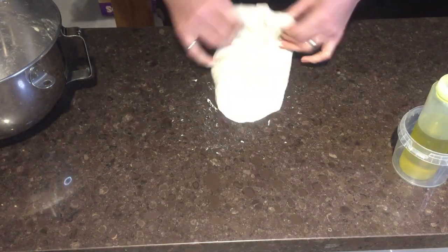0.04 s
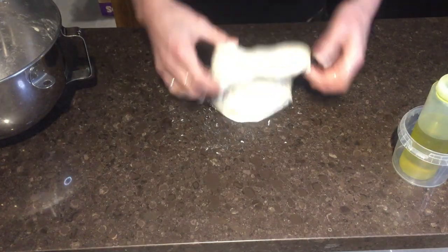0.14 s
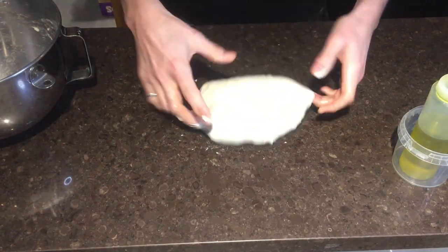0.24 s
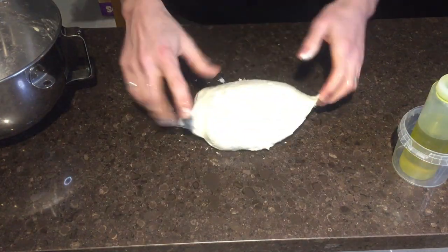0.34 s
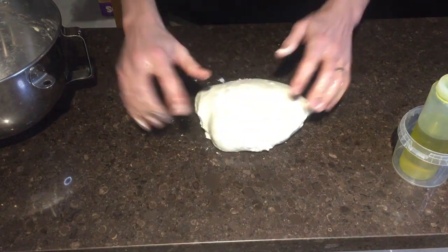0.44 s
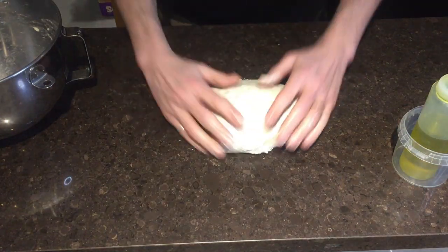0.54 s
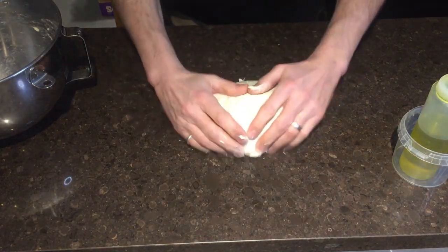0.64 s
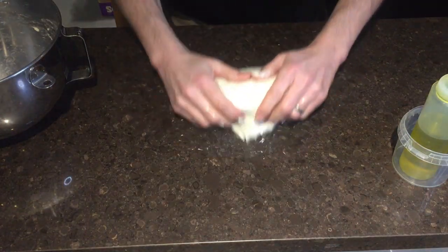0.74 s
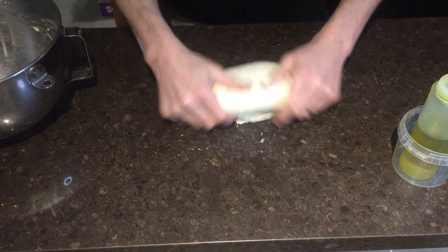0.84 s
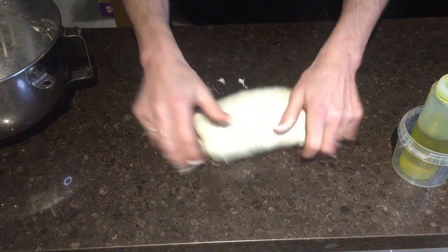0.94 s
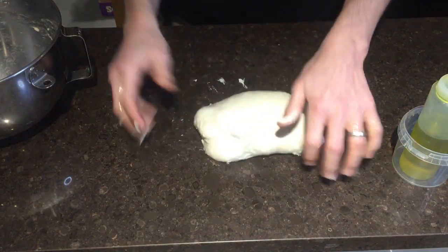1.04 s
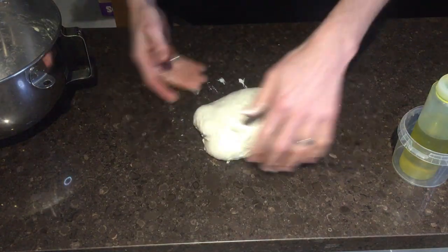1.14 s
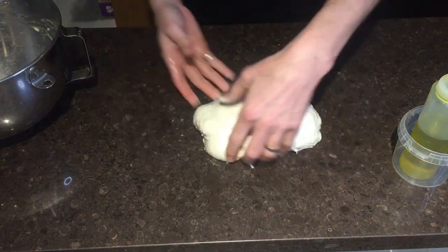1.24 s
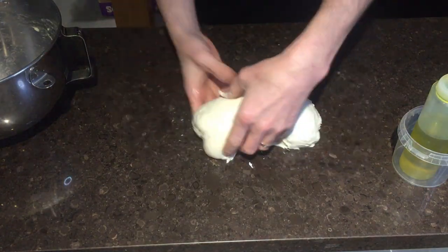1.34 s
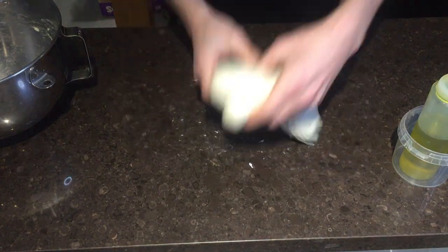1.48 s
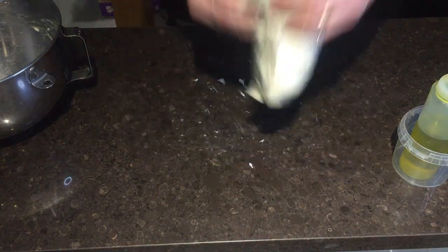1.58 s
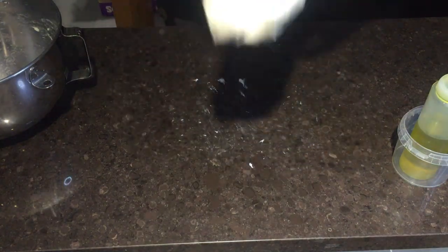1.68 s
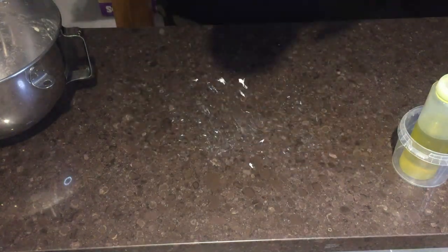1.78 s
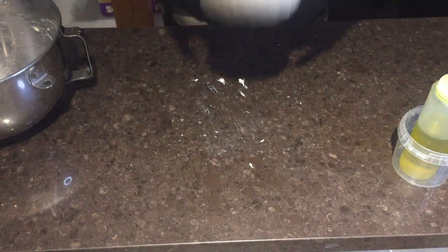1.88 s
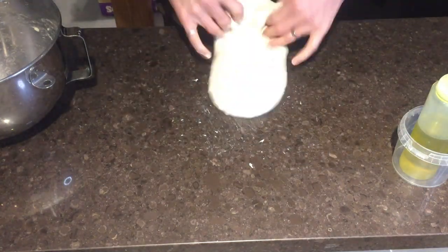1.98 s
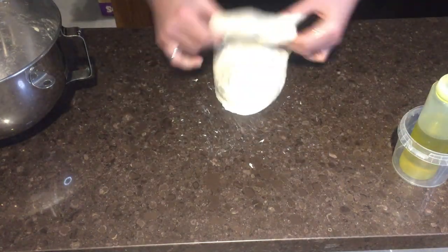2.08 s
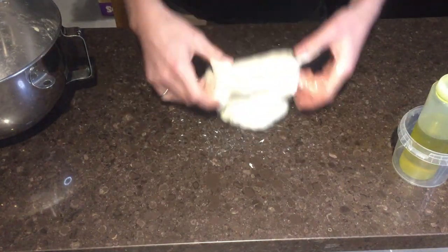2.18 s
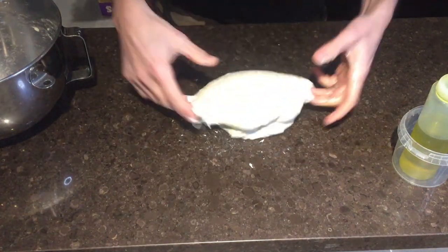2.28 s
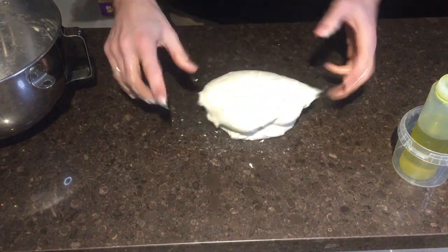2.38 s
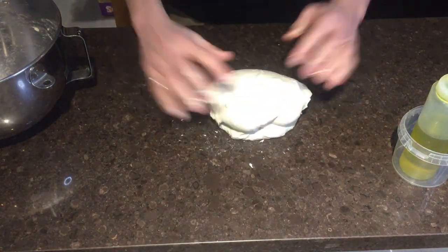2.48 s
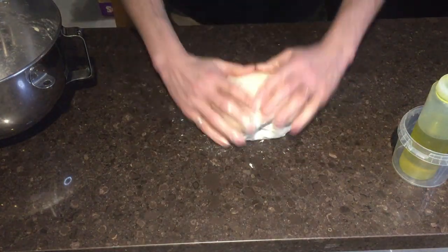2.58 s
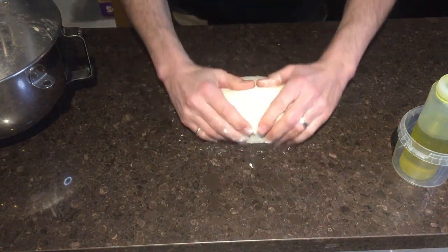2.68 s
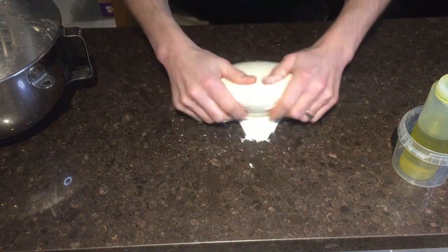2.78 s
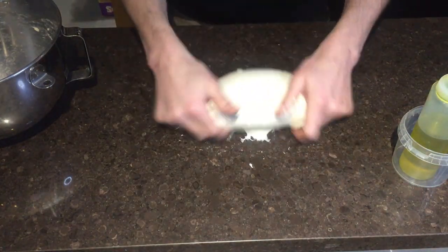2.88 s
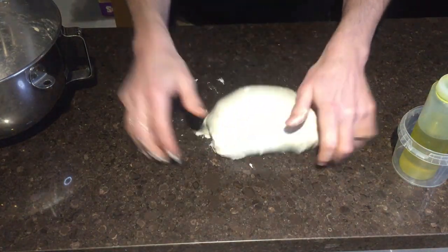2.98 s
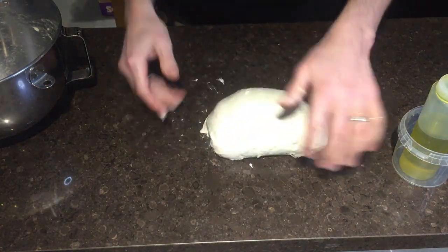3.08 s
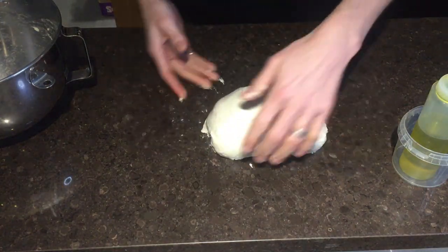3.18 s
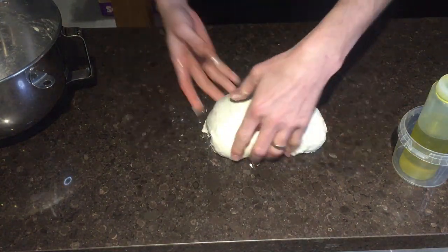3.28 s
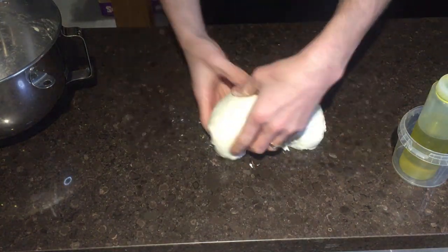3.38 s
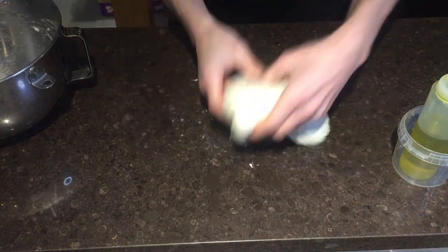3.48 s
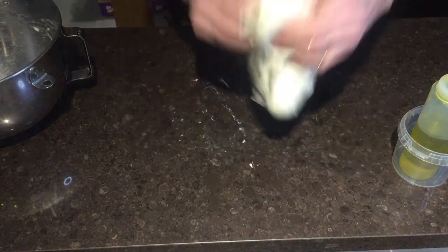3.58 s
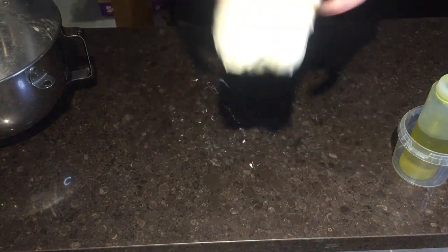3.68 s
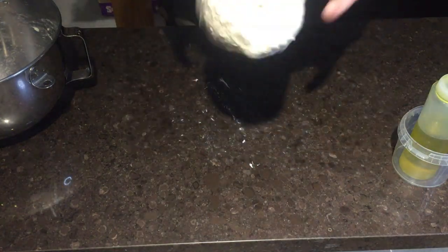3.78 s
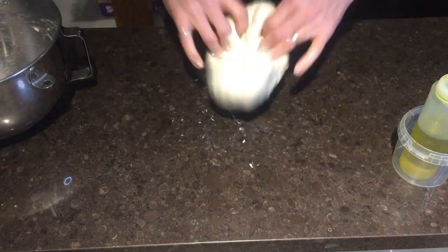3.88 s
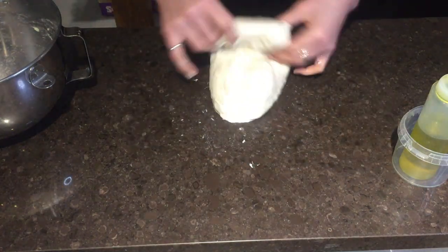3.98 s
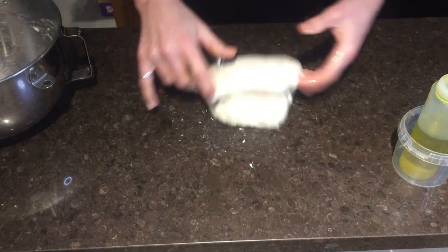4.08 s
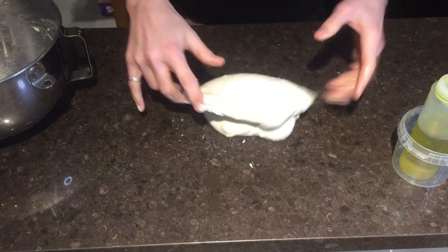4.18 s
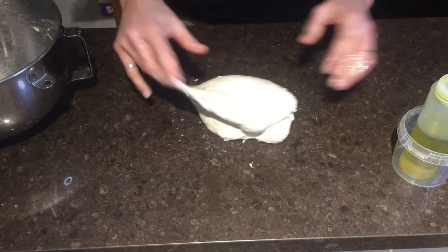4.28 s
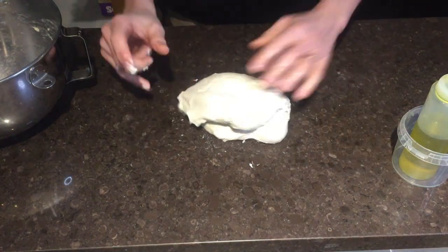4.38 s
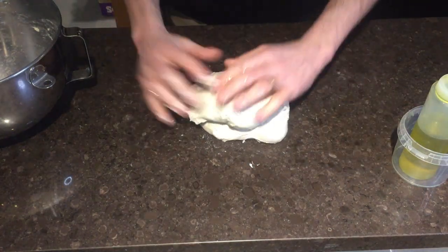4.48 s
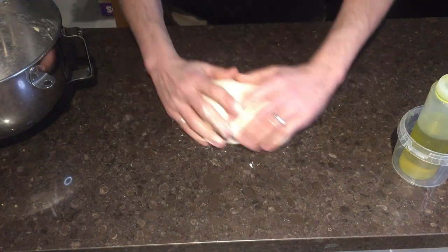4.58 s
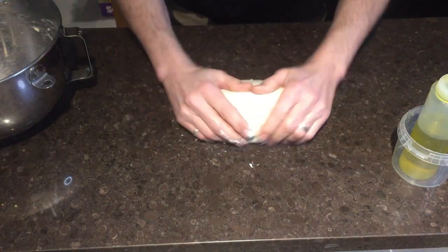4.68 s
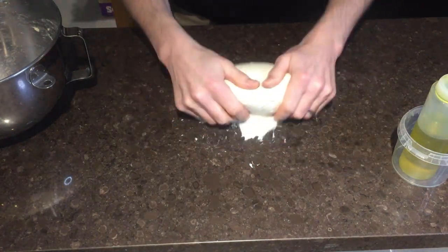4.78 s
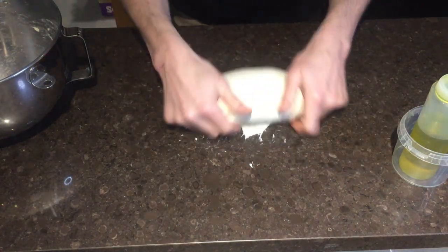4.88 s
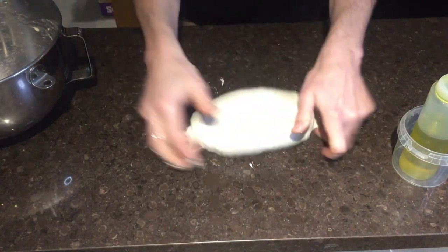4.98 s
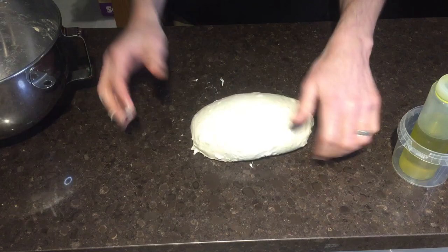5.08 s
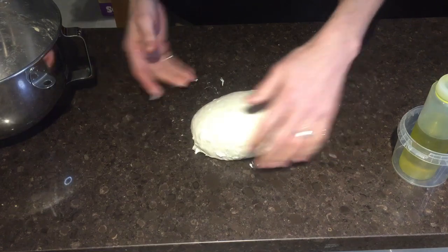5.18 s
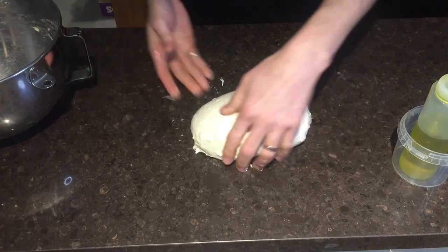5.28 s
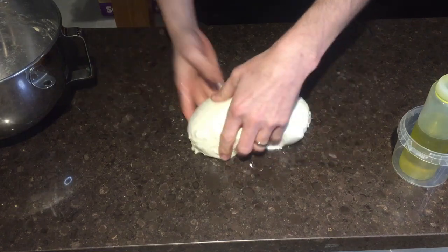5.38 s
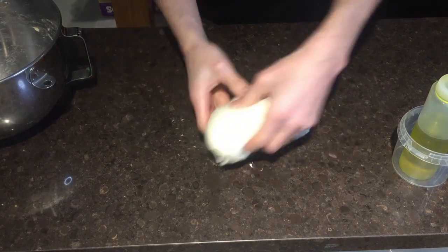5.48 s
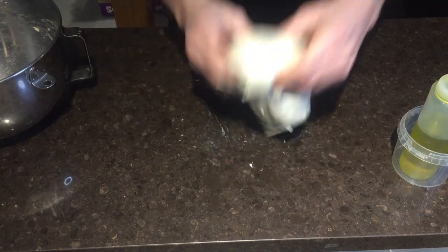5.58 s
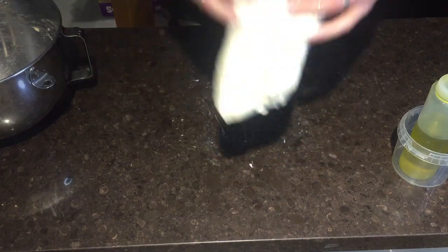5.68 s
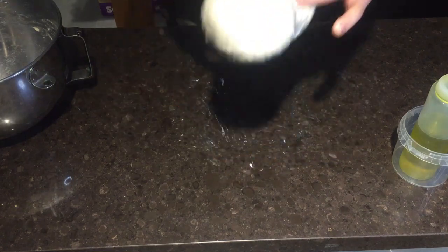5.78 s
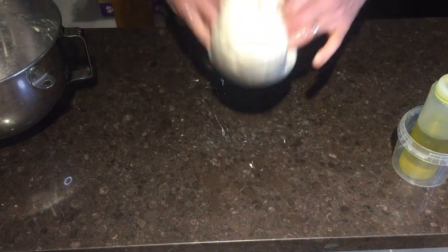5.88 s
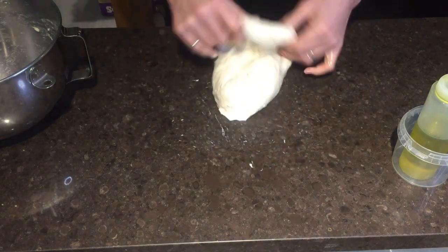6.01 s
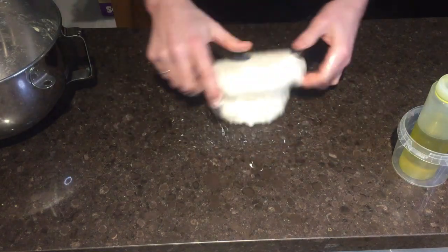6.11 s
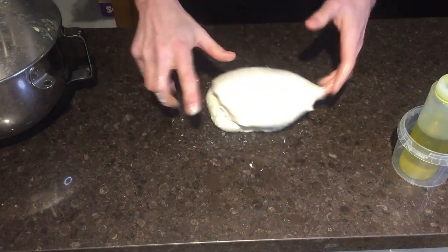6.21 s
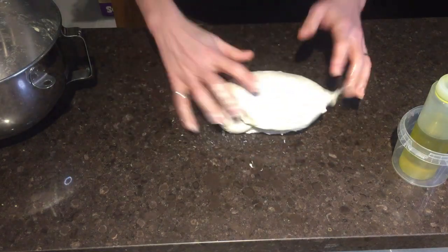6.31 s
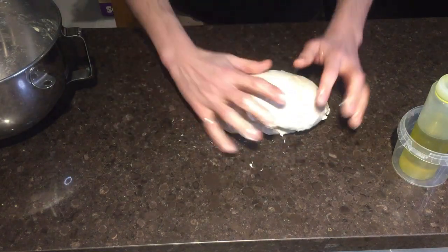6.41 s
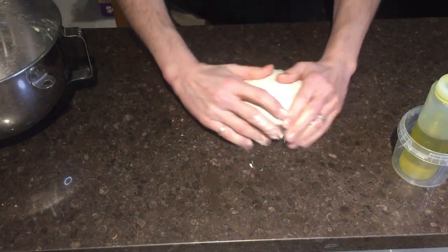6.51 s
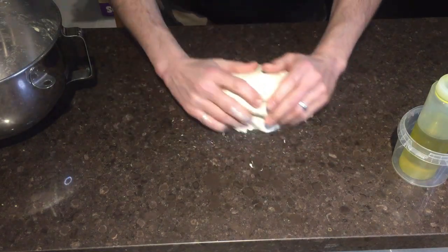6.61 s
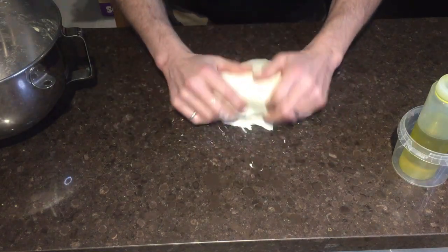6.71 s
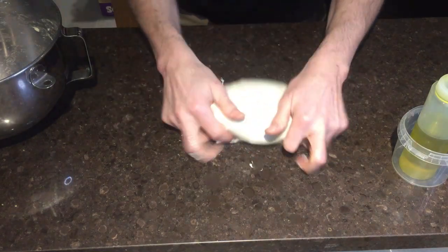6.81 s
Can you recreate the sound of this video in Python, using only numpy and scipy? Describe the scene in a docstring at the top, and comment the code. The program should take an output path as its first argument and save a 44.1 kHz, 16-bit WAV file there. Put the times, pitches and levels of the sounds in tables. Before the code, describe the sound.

Close above a kitchen worktop, a tiny rush leads into a very loud, full dough slap. Quiet handling follows: fingers pat, the mass flops over, skin rubs on stone, sticky dough crackles as it lifts. The cycle repeats with three more slaps, the later ones duller. A steel bowl nearby shimmers briefly after impacts; short room reverberation and a low hum lie underneath.

```python
"""Wet dough is slapped onto a stone countertop four times in a small kitchen; a steel mixing bowl nearby rings along.
A slap is a broadband crack, resonant pops of trapped air, a squelch, and decaying modes of the bodies it shakes.
A rush precedes the first slap; between slaps hands pat, turn, rub and peel: resonant pulses, noise, crackle.
A low appliance drone (noise through narrow resonances) and a faint hiss (coloured noise) lie underneath."""
import sys
import numpy as np
from scipy import signal
from scipy.fft import rfft, irfft
from scipy.io import wavfile

SR = 44100
rng = np.random.default_rng(int(sys.argv[2]) if len(sys.argv) > 2 else 0)


def int16_out(signal):
    """Quantize to a 16-bit WAV file."""
    q = np.round(np.clip(np.atleast_2d(signal).T, -1, 1) * 32767)
    wavfile.write(sys.argv[1], SR, q.astype(np.int16))


N = 302085
T_AFTER = np.arange(SR) / SR  # the second that follows a contact

# Slaps [t/s, air pop level/dB, air pop f/Hz, small pocket level/dB, small pocket f/Hz,
# wet crack level/dB, crack peak f/Hz, crack and squelch top f/Hz, squelch level/dB,
# counter ringing level/dB, thud level/dB, bowl level/dB before a 3 dB cut, bowl tilt/(dB per octave)]
SLAPS = [(0.0700, 31, 651.6, 24, 1213, 5.5, 8780, 18250, -31.5, 0.5, -32, -37.5, -2.5),
         (2.0579, 21, 660, 19, 1344, 8, 3286, 11000, -29.5, -8, -30, -38.5, 5.5),
         (3.9977, 21, 586.4, 17.5, 1258, 2.5, 5820, 10890, -37.5, -5.5, -35, -51, 2),
         (6.0397, 16, 476, 15, 1332, -1, 3500, 6910, -33.5, -13, -34, -48.5, 16)]
# Ringing modes of counter and cabinet [f/Hz, level/dB, t60/s]
COUNTER_MODES = [(200, -45.5, 0.57), (294, -34.5, 0.34), (338.5, -25, 0.23), (377, -30.5, 0.17),
                 (438, -32, 0.18), (546, -25.5, .14), (648, -27, .09), (641, -21.5, 0.19), (650, -26, .17),
                 (914, -25.5, .14), (1040, -26, 0.22), (1180, -28.5, .11), (1252, -26, 0.084),
                 (1336, -29.5, .12), (1350, -29, 0.074), (1486.6, -29, .08), (1737, -28, .12),
                 (2107, -24.5, 0.074)]
# Ringing modes of the steel bowl, before tilt and random spread [f/Hz, level/dB, t60/s]
BOWL_MODES = [(335, -21, 2), (948.3, -14.5, 1.7), (958, -13, .6), (980, -7, 0.67), (1038, -8.5, 0.43),
              (1804, 1.5, 0.53), (1860, -4.5, 0.65), (1927, -7.5, 0.52), (2010, -3.5, 0.47),
              (2024, 2, 0.62), (2170, -1.5, .32), (2180, -3.5, 0.31)]
# The weight of the dough shakes the whole worktop [f/Hz, level/dB, t60/s]
THUD_MODES = [(59, 1.5, 0.25), (74.0, -4.5, 0.41), (96, -4.5, 0.11), (129, -7.5, 0.16)]
# Fingers patting the dough [t/s, level/dB, f/Hz before random spread, counter share level/dB,
# hollow of the palm level/dB, wet tick level/dB, wet tick f/Hz]; the two shares add to the first level
PATS = [(1.05, -8.5, 780, 0, -10, -22, 3130), (1.098, -15, 1108, -12, -11, -27, 2300),
        (3.099, -23.5, 870, 5, 11, -23.5, 5200), (5.106, -2, 1060, -6.5, -2.5, -27, 4000),
        (6.593, -10, 1750, -8, -22, -19.5, 4200)]
# The folded mass flops over as a hand turns it [t/s, level/dB, f/Hz]
FLOPS = [(1.307, -45.5, 202), (3.344, -48, 179.2), (5.367, -51.5, 178)]
# The thickest sticky strands snapping [t/s, level/dB, f/Hz]
SNAPS = [(0.2977, -29, 8700), (0.7992, -25, 6040), (1.5008, -35, 2720), (1.8424, -21.5, 13130),
         (2.9226, -29, 9010), (3.2329, -31.5, 5900), (5.0416, -29, 10400), (6.7812, -27, 11050)]
# A rush just before the first slap (first two rows), then hands and dough rubbing on the stone,
# squeaking when the resonance is narrow
# [middle t/s, half length to 1/e /s, level/dB before a 3 dB cut, f/Hz, resonance width/Hz]
RUSH_AND_RUBS = [(0.0508, 0.0026, -45, 830, 598), (0.068, 0.0034, -24.5, 970, 683),
                 (0.761, 0.036, -52, 1520, 321), (1.387, 0.063, -62.5, 1515, 450),
                 (2.018, 0.039, -61.5, 1510, 150.4), (2.77, 0.017, -53, 1587, 250),
                 (3.404, 0.048, -63.5, 1420, 402), (3.485, .002, -52, 2010, 119.5),
                 (3.507, .003, -47.5, 2120, 159.4), (4.761, 0.0269, -61.5, 1630, 417),
                 (5.44, 0.053, -61, 1292, 300)]
# The dough lets go of the stone, when stretched sideways and when lifted
# [t/s, length/s, crackle level/dB, dull scuff level/dB]
PEELS = [(0.966, 0.052, -66, -77), (1.495, 0.047, -54.5, -62), (2.917, 0.112, -63.5, -83),
         (3.506, 0.064, -61, -71), (4.942, 0.119, -66.5, -76), (5.588, 0.034, -57, -68.5),
         (6.775, .02, -71, -72)]
# Relative spectra of peeling, of squelch and of the hiss [f/Hz, level/dB per Hz]
PEEL_SPECTRUM = [(400, -2), (1000, -2.5), (2200, 0.5), (4500, -3.5), (8000, -1.5), (15000, -2.5)]
SQUELCH_SPECTRUM = [(300, -7), (1000, 5.5), (2000, 2), (4000, 1), (8000, -4.5), (15000, -6)]
HISS_SPECTRUM = [(59, -30.5), (100, -3.5), (163, -6.5), (271, -7), (335, -8.5), (784, -17), (1390, -18),
                 (1680, -20), (1830, -20), (15000, -31.5), (16000, -31.5)]
# Response of the kitchen [f/Hz, near reflections level/dB, reverberation level/dB, reverberation t60/s]
KITCHEN = [(97, 1, 4.5, .5), (302, -0.5, -4, 0.36), (654, -1, -12.5, .36), (1500, -3.5, -8.5, .36),
           (3622, -7, -12, 0.24), (8000, -11, -10, 0.16), (15000, -13, -13, 0.073)]
# Pitches that the reflection off the worktop weakens [f/Hz, width/Hz, depth/dB]
WORKTOP_DIPS = [(238, 54, -6), (447, 10, -4.5), (816, 160, -7.5), (4900, 290, -3)]

HISS_DB, DRONE_DB, DRONE_HZ, DRONE_WIDTH_HZ = -67.5, -51, 51.8, 4.3
CUTOFF_HZ = 16300
PALM_HZ = 336  # the hollow under a cupped hand
FINGER_GAP_S, FINGER_LOSS_DB = 0.0045, 10  # the fingers of a hand land one after another
# each turning flop rebounds once, softer and lower; the last value is a frequency ratio
FLOP_T60_S, REBOUND_S, REBOUND_DB, REBOUND_PITCH = 0.095, 0.03, -10.5, 0.74
# after a slap the mass settles in a few dying wobbles
SETTLE_DELAY_S, SETTLE_DB, SETTLE_HZ, WOBBLE_S, WOBBLE_LOSS_DB = 0.064, -40, 197.4, 0.046, 6.5
CREEP_S, CREEP_DB, CREEP_RISE_S = 0.17, -71.5, 0.046  # the first bonds give way before it lets go
PEEL_RISE_S, PEEL_T60_S = 0.014, 0.2  # the flare grows exponentially, holds and dies
SCUFF_HZ, SCUFF_WIDTH_HZ = 1420, 1000


def from_db(db):
    """Level: twenty decibels are a factor of ten in amplitude."""
    return 10 ** (np.asarray(db) / 20)


def rms_one(x):
    """Normalisation: scale to unit root mean square."""
    return x / np.sqrt(np.mean(x ** 2) + 1e-20)


def at_hz(points, hz, column=1):
    """Interpolation: read a table on a logarithmic frequency axis."""
    points = np.array(points)
    return np.interp(np.log(hz + 1e-9), np.log(points[:, 0]), points[:, column])


def add(track, t, sound):
    """Superposition: sounds add linearly, here from time t in seconds."""
    start = round(t * SR)
    track[start:start + len(sound)] += sound[:N - start]


def fade(t60):
    """Exponential damping: the level falls 60 dB in t60 seconds."""
    return from_db(-60 * T_AFTER / t60)


def resonate(x, hz, width_hz):
    """Resonance: a two-pole filter with gain close to 1 at its centre."""
    radius = np.exp(-np.pi * width_hz / SR)
    zeros = np.array([1, 0, -1]) * (1 - radius * radius) / 2
    poles = [1, -2 * radius * np.cos(2 * np.pi * hz / SR), radius * radius]
    return signal.lfilter(zeros, poles, x + 1e-18)


def cut(x, hz, kind, order=2):
    """Filtering: a Butterworth low-, high- or band-pass."""
    edge = np.minimum(hz, 0.45 * SR)
    return signal.sosfilt(signal.butter(order, edge, kind, fs=SR, output="sos"), x)


def colour(x, spectrum):
    """Spectral shaping: weight each frequency of a noise, then set its rms to 1."""
    gain = from_db(at_hz(spectrum, np.fft.rfftfreq(len(x), 1 / SR)))
    return rms_one(irfft(rfft(x) * gain, len(x)))


def ring(modes):
    """Modal synthesis: a struck body sounds as a sum of decaying sines."""
    return sum(from_db(db) * np.sin(2 * np.pi * hz * T_AFTER) * fade(t60) for hz, db, t60 in modes)


def burst(length_s):
    """Impulsive excitation: a brief noise of nearly even spectrum and unit energy."""
    age = T_AFTER[:2048]
    spray = rfft(rng.standard_normal(len(age)) * np.exp(-(age / length_s) ** 2))
    flat = irfft(spray / np.abs(spray))
    flat = flat * (age < 5 * length_s)
    return flat / np.linalg.norm(flat)


def crackle(per_s, spread_db, size):
    """Random point process: tiny impulses at random times, a few much larger than the rest."""
    sizes = from_db(spread_db * np.minimum(rng.exponential(1, size), 5))
    breaks = rng.random(size) < per_s / SR
    return breaks * sizes * rng.choice([-1, 1], size)


def clumps(per_s, depth_db):
    """Random modulation: an uneven gain over one second."""
    return from_db(depth_db * np.interp(T_AFTER * per_s, np.arange(400), rng.uniform(-1, 1, 400)))


def background():
    """Filtered noise: narrow resonances give a wavering low drone, a broad spectrum the hiss of the room."""
    noise = rng.standard_normal(N + SR)
    drone = resonate(resonate(noise, DRONE_HZ, DRONE_WIDTH_HZ), DRONE_HZ, 33)
    drone = drone[SR:]  # skip the build-up of the resonance
    hiss = colour(rng.standard_normal(N), HISS_SPECTRUM)
    return from_db(DRONE_DB) * rms_one(drone) + from_db(HISS_DB) * hiss


def kitchen(x):
    """Convolution: quick reflections from wall and cupboards, then a reverberation that dies sooner in the treble."""
    response, edges = np.zeros(SR), np.geomspace(70, 18000, 17)
    for low, high in zip(edges, edges[1:]):
        centre = np.sqrt(low * high)
        near_db, late_db, t60 = (at_hz(KITCHEN, centre, column=k) for k in range(1, 4))
        for db, decay, delay_s in ((near_db, 0.085, 0.003), (late_db, t60, 0.009)):
            tail = rng.standard_normal(SR) * fade(decay) * (T_AFTER > delay_s)
            band = cut(tail, np.array([low, high]), "band")
            share = np.sqrt(2 * (high - low) / SR)  # energy in proportion to bandwidth
            response += from_db(db) * band / np.linalg.norm(band) * share
    return signal.fftconvolve(x, response)[:N]


def worktop(x):
    """Interference: sound glancing off the stone hollows out a few bands."""
    for hz, width_hz, depth_db in WORKTOP_DIPS:
        x = x - (1 - from_db(depth_db)) * resonate(x, hz, width_hz)
    return x


def resonant_noise(hz, width_hz):
    """Resonance: uneven random impulses excite one resonance and a weaker one an octave above."""
    impulses = crackle(per_s=2500, spread_db=2.5, size=SR) * clumps(per_s=170, depth_db=6)
    main = rms_one(resonate(impulses, hz, width_hz))
    above = rms_one(resonate(impulses, 2 * hz, 3 * width_hz))
    both = main + from_db(-4.5) * above
    return rms_one(cut(cut(both, 0.5 * hz, "high"), 3600, "low"))


def rush_and_rubs():
    """Amplitude envelope: the rush and each rub of resonant noise swell and die away evenly, as a Gaussian."""
    out = np.zeros(N)
    for t, half_s, db, hz, width_hz in RUSH_AND_RUBS:
        start = max(t - 0.2, 0)
        swell = np.exp(-((start + T_AFTER - t) / half_s) ** 2)
        add(out, start, from_db(db - 3.0) * resonant_noise(hz, width_hz) * swell)
    return out


def peeling():
    """Adhesive failure: bright crackle creeps in under the pull, flares and scuffs as dough lets go, then dies."""
    out, since = np.zeros(N), T_AFTER - CREEP_S
    creep = from_db(CREEP_DB) * np.minimum(T_AFTER / CREEP_RISE_S, 1)
    letting_go = np.exp(np.minimum(since, 0) / PEEL_RISE_S)
    for t, length_s, db, scuff_db in PEELS:
        release = from_db(-60 * np.maximum(since - length_s, 0) / PEEL_T60_S)
        bonds = colour(crackle(per_s=7000, spread_db=4.5, size=SR), PEEL_SPECTRUM)
        bonds = bonds * clumps(per_s=68, depth_db=4.5)
        bonds = bonds * np.maximum(creep, from_db(db) * letting_go)
        scuff = from_db(scuff_db) * resonant_noise(SCUFF_HZ, SCUFF_WIDTH_HZ) * letting_go
        add(out, t - CREEP_S, (bonds + scuff) * release)
    return out


def snap(hz):
    """Impulse response: a parting wet strand gives one short bright tick."""
    return resonate(burst(length_s=0.0031), hz, 0.24 * hz)


def snaps():
    """Sudden release of tension: the thickest strands part one by one."""
    out = np.zeros(N)
    for t, db, hz in SNAPS:
        add(out, t, from_db(db) * snap(hz))
    return out


def flop(hz):
    """Damped oscillation: the soft mass wobbles for a few cycles."""
    return np.sin(2 * np.pi * hz * T_AFTER) * (1 - fade(t60=0.0077)) * fade(FLOP_T60_S)


def flops():
    """Rebound and damping: the turned mass bounces once, the slapped mass settles in four weakening wobbles."""
    out = np.zeros(N)
    for t, db, hz in FLOPS:
        add(out, t, from_db(db) * flop(hz))
        add(out, t + REBOUND_S, from_db(db + REBOUND_DB) * flop(REBOUND_PITCH * hz))
    for t, *_ in SLAPS:
        for k in range(4):
            wobble = flop(SETTLE_HZ * rng.uniform(0.893, 1.05))
            add(out, t + SETTLE_DELAY_S + k * WOBBLE_S, from_db(SETTLE_DB - k * WOBBLE_LOSS_DB) * wobble)
    return out


def pop(hz, damping):
    """Damped cavity resonance: a small pocket of air gives way in a few cycles."""
    return resonate(signal.unit_impulse(SR), hz, hz * damping)


def pats():
    """Impulse response: a pat sounds the hollow of the palm, the counter, and three finger contacts in turn."""
    out = np.zeros(N)
    counter = from_db(-31) * ring(COUNTER_MODES) * fade(t60=0.14)  # the resting hand damps it
    palm = cut(pop(PALM_HZ, damping=0.22), 700, "low")
    for t, db, hz, counter_db, palm_db, tick_db, tick_hz in PATS:
        add(out, t, from_db(db) * (from_db(palm_db) * palm + from_db(counter_db) * counter))
        for k in range(3):
            lands, loss_db = t + k * FINGER_GAP_S, k * FINGER_LOSS_DB
            finger = cut(pop(hz * rng.uniform(0.811, 1.13), damping=0.52), 1.32 * hz, "low")
            add(out, lands, from_db(db - loss_db) * finger)
            add(out, lands, from_db(tick_db - loss_db) * snap(tick_hz))
    return out


def bowl(tilt_db):
    """Sympathetic vibration: the bowl takes up the shaking gradually, so its ring blooms after the blow."""
    rings = np.zeros(SR)
    for hz, db, t60 in BOWL_MODES:
        tilted_db = db + tilt_db * np.log2(hz / BOWL_MODES[-1][0])
        mode = (hz, tilted_db + rng.uniform(-2, 2.9), t60)  # a little different each time
        rings += ring([mode]) * clumps(per_s=45, depth_db=5)  # each partial wavers on its own
    return rings * (1 - np.exp(-(T_AFTER / 0.09) ** 2))


def wet_crack(peak_hz, top_hz):
    """Impact: wet skin meets stone in a broadband burst with one broad resonance."""
    crack = cut(cut(burst(length_s=0.0015), top_hz, "low", order=1), 1500, "high")
    return crack + 0.97 * resonate(crack, peak_hz, 0.2 * peak_hz)


def squelch(top_hz):
    """Viscous spreading: dense wet crackle in uneven patches decays as the dough spreads."""
    wet = colour(crackle(per_s=6000, spread_db=3, size=SR), SQUELCH_SPECTRUM)
    wet = wet * clumps(per_s=130, depth_db=4)
    return cut(wet, top_hz, "low", order=1) * fade(t60=0.28)


def slaps():
    """Impact excitation: skin cracks, trapped air pops, dough spreads; returns airborne sound and bodies."""
    air, bodies = np.zeros(N), np.zeros(N)
    counter, thud = ring(COUNTER_MODES), ring(THUD_MODES)
    for (t, pop_db, pop_hz, pocket_db, pocket_hz, crack_db, peak_hz, top_hz,
         squelch_db, counter_db, thud_db, bowl_db, tilt_db) in SLAPS:
        add(air, t, from_db(crack_db) * wet_crack(peak_hz, top_hz))
        add(air, t + 0.0005, from_db(pocket_db) * cut(pop(pocket_hz, damping=0.35), 2700, "low"))
        add(air, t + 0.0013, from_db(pop_db) * cut(pop(pop_hz, damping=0.48), 1400, "low"))
        add(bodies, t + 0.0026, from_db(squelch_db) * squelch(top_hz))
        add(bodies, t + 0.001, from_db(counter_db) * counter)
        add(bodies, t, from_db(thud_db) * thud)
        add(bodies, t, from_db(bowl_db - 3.0) * bowl(tilt_db))
    return air, bodies


def scene():
    """Superposition: all the handling in the kitchen, heard from just above the counter."""
    air, bodies = slaps()
    near = air + pats() + flops() + snaps() + rush_and_rubs() + peeling()
    handling = worktop(near + kitchen(near) + bodies)
    return (handling + background())[None]


def record(dry):
    """Band limiting: the small microphone drops the deepest bass, full scale bounds the peaks, the top is cut."""
    heard = np.clip(cut(cut(dry, 32, "high"), 32, "high"), -1, 1)
    return signal.sosfilt(signal.ellip(10, 0.1, 80, CUTOFF_HZ, fs=SR, output="sos"), heard)


dry = scene()
out = record(dry)
int16_out(out)
```